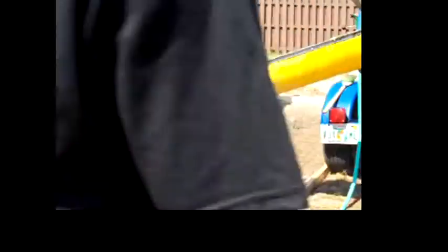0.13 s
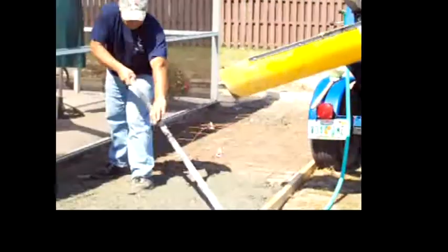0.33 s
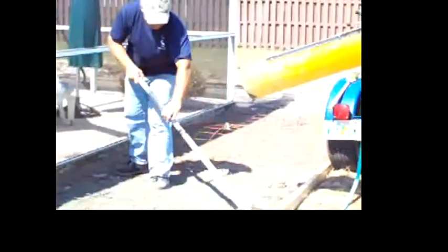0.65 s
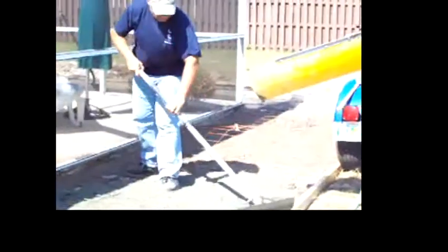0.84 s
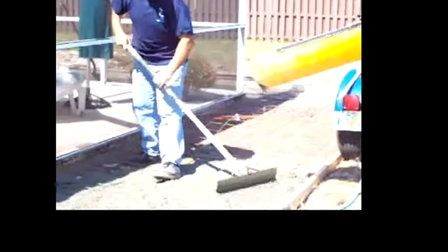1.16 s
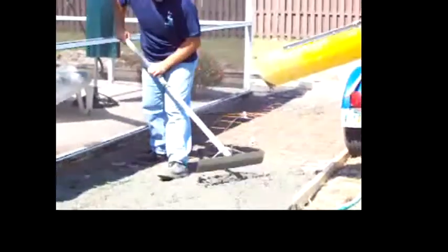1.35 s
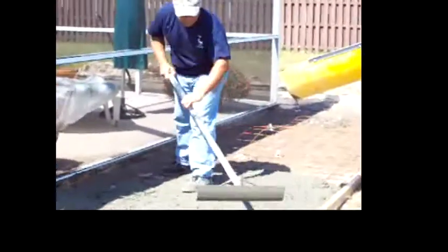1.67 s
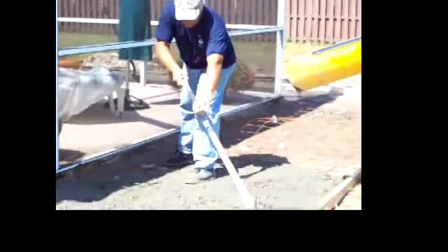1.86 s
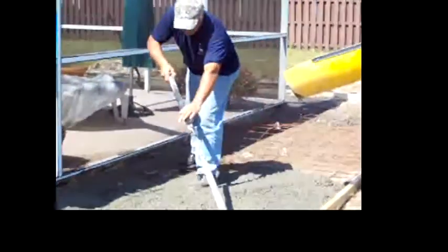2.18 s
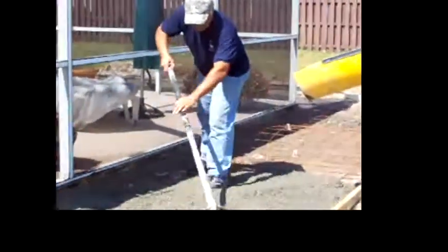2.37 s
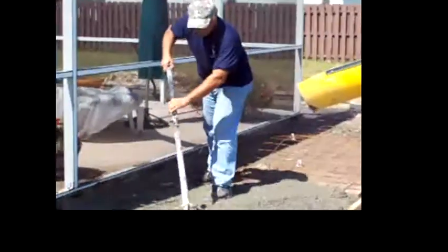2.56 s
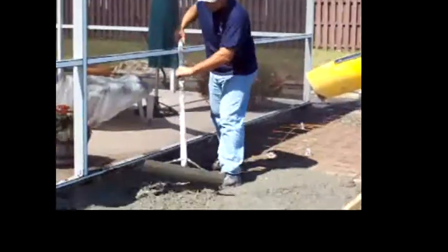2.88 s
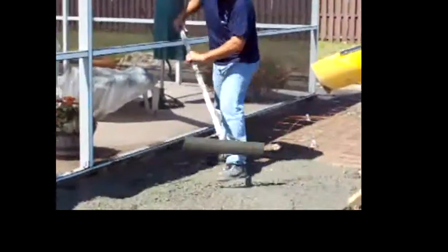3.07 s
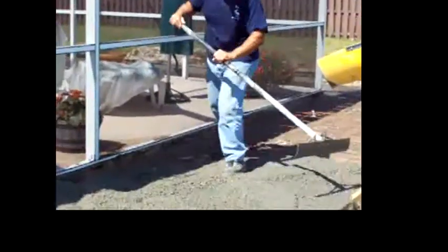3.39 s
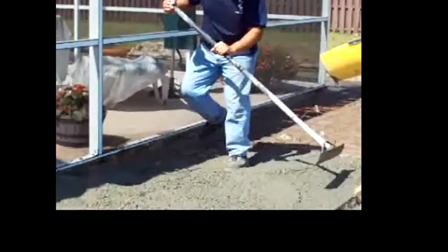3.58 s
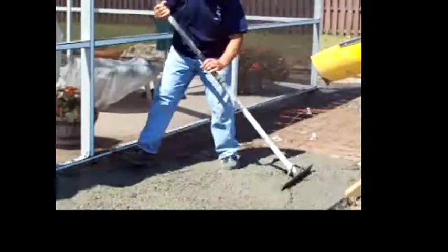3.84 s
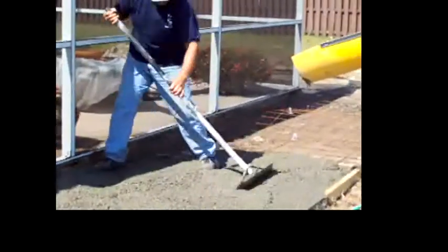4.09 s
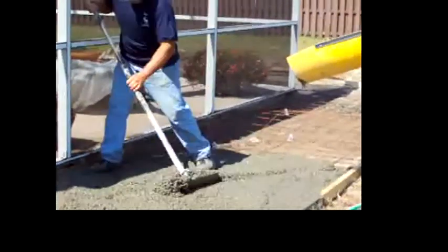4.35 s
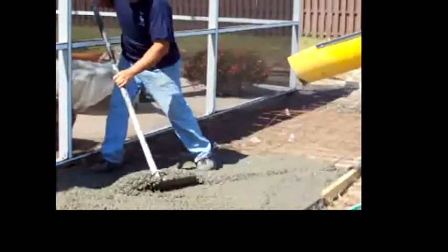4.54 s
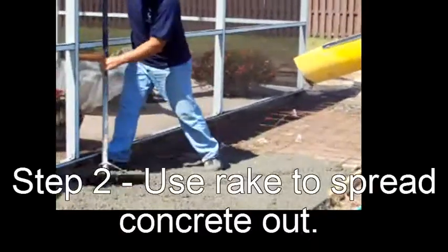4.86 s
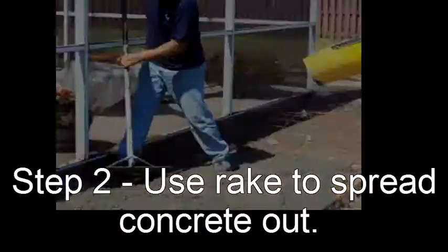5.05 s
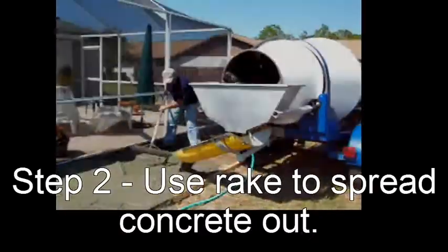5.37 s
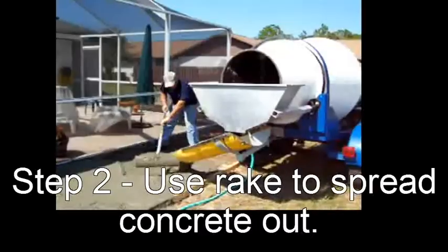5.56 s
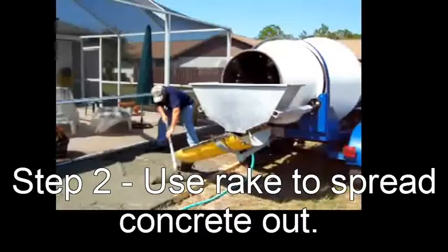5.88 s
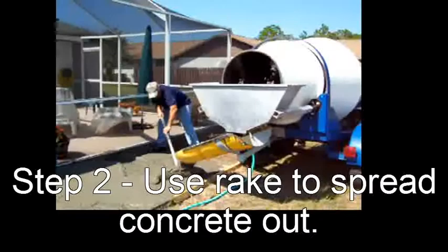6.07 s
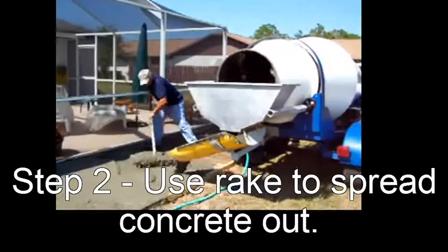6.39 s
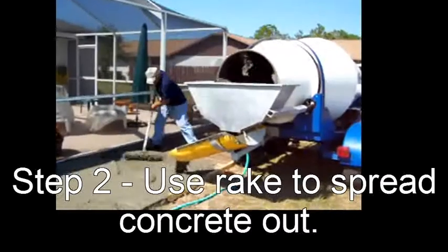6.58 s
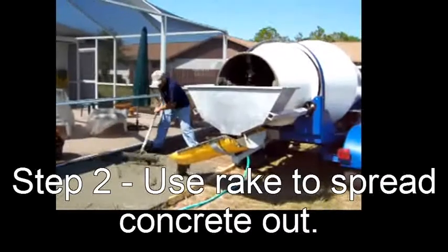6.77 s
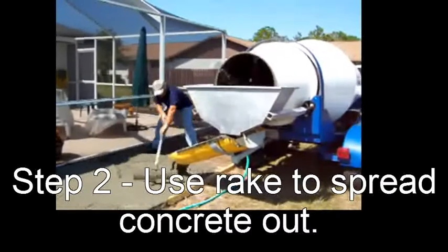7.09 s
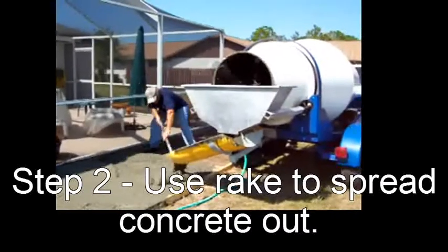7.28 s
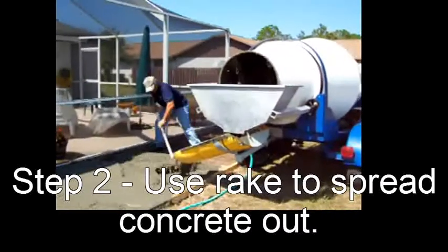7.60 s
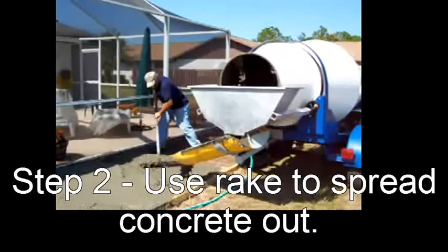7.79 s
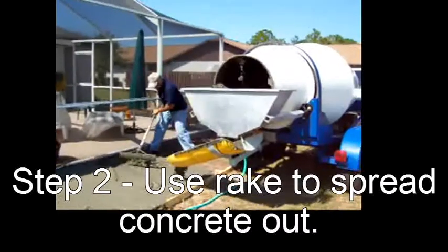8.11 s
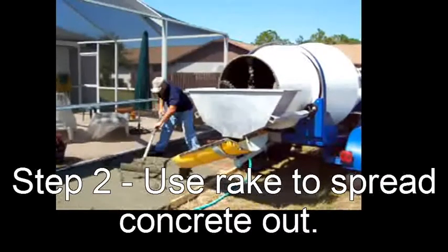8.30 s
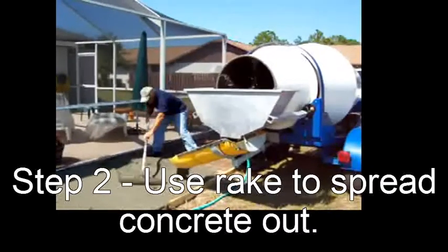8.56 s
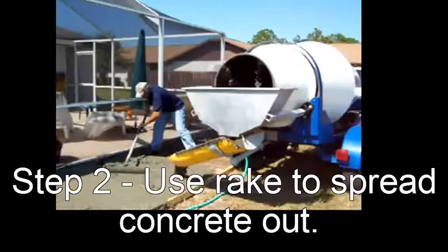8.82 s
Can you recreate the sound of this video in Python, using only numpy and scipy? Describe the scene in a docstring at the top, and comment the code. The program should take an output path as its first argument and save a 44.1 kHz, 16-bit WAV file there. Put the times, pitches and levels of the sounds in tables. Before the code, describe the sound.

A concrete mixer's engine drones in rapid throbbing puffs, heard first from beside the slab with rattling valves, a faint high whine and wet stones tumbling. A few clicks and knocks stand out. After a third of a second of silence, the view is nearer the drum: heavier churning, hollow steel ringing, no whine, gradually softening. Dull, narrow-band, slightly overloaded pickup in an open yard.

```python
"""In a back yard, a single-cylinder four-stroke engine turns the steel drum of a concrete mixer trailer.
The exhaust throbs as a stack of tones locked to the firing, and a thin drive whine sings with it at first.
Valves and piston clatter as noise bursts, wet gravel churns as random blows, and cooling air is plain noise;
all three are coloured by the steel covers and drum. Single stones and tools knock as ringing bursts.
It is heard first from beside the slab, then, after a short silence, from close to the drum."""
import sys
import numpy as np
from scipy import signal
from scipy.fft import rfft, irfft, next_fast_len
from scipy.io import wavfile
from scipy.ndimage import uniform_filter1d

SR = 44100
rng = np.random.default_rng(int(sys.argv[2]) if len(sys.argv) > 2 else 0)


def transcribe(signal):
    """Save signal, clipped to [-1, 1], as a 16-bit WAV file at the path in sys.argv[1]."""
    frames = np.atleast_2d(signal).T
    limited = np.clip(frames, -1, 1)
    pcm = np.round(limited * 32767).astype(np.int16)
    wavfile.write(sys.argv[1], SR, pcm)


N = 394251
TIME = np.arange(N) / SR

# exhaust tones: multiple of the firing rate, level at the slab/dB, level at the drum/dB
EXHAUST_TONES = [(1, -38, -37), (2, -32.5, -32), (3, -47.5, -38.5), (4, -27, -27.5), (5, -30.5, -31),
                 (6, -27, -22.5), (7, -30.5, -25), (8, -31, -23), (9, -32, -28.5), (10, -34.5, -38.5),
                 (11, -38, -32), (12, -35, -31.5), (13, -50.5, -44.5), (14, -39.5, -51.5), (16, -49, -43),
                 (19, -41.5, -33), (20, -51, -37), (22, -39.5, -35.5), (23, -42.5, -51.5), (24, -39.5, -28),
                 (25, -43, -32), (28, -40, -32.5), (30, -40, -31.5), (32, -40.5, -30.5), (33, -35, -40.5),
                 (34, -35.5, -30), (35, -41, -37.5), (37, -37, -32)]
# broad colour of the machine: f/Hz, density at the slab/dB per Hz, density at the drum/dB per Hz,
# for a drive of unit power and before the panels ring
MACHINE_COLOUR = [(20, -52, -57), (45, -52, -48.5), (90, -51.5, -53.5), (165, -52.5, -53.5),
                  (332, -49, -48.5), (444, -59.5, -59.5), (640, -58, -46.5), (952, -49, -45.5),
                  (1430, -72, -63.5), (1900, -66.5, -59.5), (2455, -55, -52), (2907, -57.5, -53.5),
                  (3086, -62.5, -58.5), (3960, -68.5, -63)]


def from_db(db):
    """Decibels to gain."""
    return 10 ** (np.asarray(db) / 20)


def rms_one(x):
    """Scale to unit power."""
    return x / np.sqrt(np.mean(x ** 2) + 1e-20)


def in_time(rows):
    """Draw each column of a time table as a curve over every sample."""
    times, *columns = np.transpose(rows)
    return [np.interp(TIME, times, column) for column in columns]


def swing_db(load):
    """How far churning and rattle stand above the mean of their table rows, in dB."""
    means = np.mean(load, axis=0)[1:]
    return [curve - mean for curve, mean in zip(in_time(load), means)]


def drift(rate_hz):
    """Slow random wander with a spread of one: noise through two equal one-pole lowpasses."""
    step = 40  # samples between the points of the wander
    r = np.exp(-2 * np.pi * rate_hz * step / SR)
    noise = rng.standard_normal(N // step + 2002)
    slow = signal.lfilter([1], [1, -2 * r, r * r], noise)[2000:]  # drop the filter's start-up
    return np.interp(np.arange(N) / step, np.arange(len(slow)), rms_one(slow))


def resonate(x, hz, width_hz):
    """One two-pole resonance with a gain of one at its peak."""
    r = np.exp(-np.pi * width_hz / SR)
    zeros = np.array([1, 0, -1]) * (1 - r * r) / 2
    poles = [1, -2 * r * np.cos(2 * np.pi * hz / SR), r * r]
    return signal.lfilter(zeros, poles, x)


def coloured(x, hz, db):
    """Shape a white signal of unit power to a spectrum in dB per Hz, falling off below the first point."""
    size = next_fast_len(N)
    f = np.maximum(np.arange(size // 2 + 1) * SR / size, 1)
    gain = from_db(np.interp(np.log(f), np.log(hz), db)) * np.minimum(f / hz[0], 1)
    return irfft(rfft(x, size) * gain, size)[:N] * np.sqrt(SR / 2)


def heard(span, fade_in_s=0.022, fade_out_s=0.00092):
    """One within a stretch of time, zero outside, with quick edges."""
    opening = (TIME - span[0]) / fade_in_s + .5
    closing = (span[1] - TIME) / fade_out_s
    return np.clip(np.minimum(opening, closing), 0, 1) ** 2


def crank(speed, start_s, wobble=.0012):
    """Engine cycles, one firing each, counted from a start time; no two take quite as long."""
    rate, = in_time(speed)
    return np.cumsum(rate * (TIME >= start_s)) / SR + wobble * drift(12)


def boom_db(order):
    """Now and then one exhaust tone booms out in a bell-shaped swell."""
    # booms: t at the height/s, multiple of the firing rate, lift/dB, length/s
    booms = [(0.302, 24, 8.5, .9), (0.397, 7, 6, 0.98), (2.9, 8, 9.5, 0.87), (3.25, 11, 17.5, 0.34),
             (3.904, 11, 8.5, 0.22), (5.996, 12, 8.5, 0.22), (6.891, 24, 8, 0.72), (7.245, 12, 7, 0.82),
             (4.352, 8, 6, 0.32), (5.102, 8, 7, 0.47), (8.252, 9, 7.5, 0.7)]
    return sum(db * np.exp(-(2 * (TIME - s) / length) ** 2)
               for s, which, db, length in booms if round(which) == order)


def exhaust(cycles, levels, rings_hz, unsteady_db=0.3, slip=0.016, scatter=.2):
    """One puff a cycle as a stack of tones; muffler and yard smear the puff across the cycle."""
    firing_hz, ring_half_width_hz = 28, 4  # nominal rate that sets the lags
    fade_db_per_order, fade_most_db, fades_hz = 0.2, 3, 1.8
    diffuse_order = 6  # tones above this multiple arrive by many paths, out of step
    force = unsteady_db * drift(7.5)
    out = 0
    for order, db in zip(np.round(np.array(EXHAUST_TONES)[:, 0]), levels):
        # tones fade in and out among the yard's echoes, the high ones more deeply
        fading = min(fade_db_per_order * order, fade_most_db) * drift(fades_hz)
        # each resonance holds the puff back by its phase, in radians
        lag = sum(np.arctan((order * firing_hz - hz) / ring_half_width_hz) for hz in rings_hz)
        lag = lag + slip * order * drift(5)
        lag = lag + scatter * max(order - diffuse_order, 0) * rng.standard_normal()
        gain = np.sqrt(2) * from_db(db + fading + boom_db(order) + force)
        out = out + gain * np.cos(2 * np.pi * order * cycles - lag)
    return out


def whine(speed, waver_hz=13, flicker_db=1.0):
    """The drive, geared to the engine, sings one thin wavering tone that rises and falls with its speed."""
    per_firing = 72.5  # whine cycles per firing
    start_db, rise_db, rise_at_s, rise_s = -39, 4.7, 4, .25  # it grows louder once and stays so
    hz = per_firing * in_time(speed)[0] + waver_hz * drift(25)
    db = start_db + rise_db * np.clip((TIME - rise_at_s) / rise_s + .5, 0, 1)
    gain = np.sqrt(2) * from_db(db + flicker_db * drift(22))
    return gain * np.sin(2 * np.pi * np.cumsum(hz) / SR)


def clatter(cycles, decay=0.12, repeat_db=7.0, low_hz=420):
    """Valves and piston strike at fixed crank angles; each short rattle partly repeats every cycle."""
    # metal contacts: share of the cycle, relative strength/dB
    contacts = [(0.209, 1.5), (.29, -6.5), (.65, -1), (.85, 0.5)]
    force = 0
    for angle, db in contacts:
        since_strike = (cycles - angle) % 1
        force = force + from_db(db) * np.exp(-since_strike / decay)  # decay as a share of the cycle
    pattern = rng.standard_normal(1560)
    place = (cycles % 1 * (len(pattern) - 1)).astype(int)
    rattle = rng.standard_normal(N) + from_db(repeat_db) * pattern[place]
    # hard contacts carry little bass
    no_bass = signal.butter(2, low_hz, "high", fs=SR, output="sos")
    return rms_one(signal.sosfilt(no_bass, force * rattle))


def gravel(per_s=2500, size_db=2.0, clump_db=2.0, low_hz=250):
    """Stones tumble against the drum wall as random single blows that come in clumps."""
    hits = rng.random(N) < per_s * from_db(clump_db * drift(9)) / SR
    size = from_db(size_db * np.minimum(rng.exponential(1, N), 4))
    blows = hits * size * rng.choice([-1, 1], N)
    no_bass = signal.butter(1, low_hz, "high", fs=SR, output="sos")
    return rms_one(signal.sosfilt(no_bass, blows))


def machine(cycles, colour, panels, load, clatter_db, gravel_db, fan_db, split_hz=1600):
    """Clatter, gravel and cooling air all sound through the same steel covers and drum."""
    surge_db, surges_hz = .5, 2.3  # the churning surges at random as the mix tumbles
    drive = from_db(clatter_db) * clatter(cycles) + from_db(gravel_db) * gravel()
    drive = drive + from_db(fan_db) * rng.standard_normal(N)
    body = coloured(drive, np.array(MACHINE_COLOUR)[:, 0], colour)
    body = body + sum((from_db(db) - 1) * resonate(body, hz, width) for hz, width, db in panels)
    low = signal.sosfiltfilt(signal.butter(2, split_hz, fs=SR, output="sos"), body)
    high = body - low
    churn_db, rattle_db = swing_db(load)
    churn_db = churn_db + surge_db * drift(surges_hz)
    return from_db(churn_db) * low + from_db(rattle_db) * high


def knocks():
    """Stones and tools knock singly: each a brief noise burst that rings broadly around its pitch."""
    # knocks and clacks: t/s, level/dB, f/Hz, decay/s
    strikes = [(.3244, -12, 2100, .003), (.3258, -7, 2750, .003), (.3292, -8, 950, .0035),
               (.71, -24, 3200, .02), (.805, -22, 2700, .006), (1.137, -17.5, 2700, .014),
               (2.084, -20, 2700, .008), (3.858, -22, 2750, .02), (3.888, -20.5, 2650, .035),
               (5.738, -12, 750, .022), (6.3845, -15, 2500, .005), (7.396, -16, 2500, .006)]
    out = np.zeros(N)
    age = np.arange(SR // 5) / SR
    for s, db, hz, decay in strikes:
        dying = np.exp(-age / decay)
        burst = rms_one(resonate(rng.standard_normal(len(age)), hz, hz / 2) * dying)
        at = round(s * SR)
        # a longer decay carries more energy
        out[at:at + len(age)] += from_db(db) * burst * np.sqrt(np.mean(dying ** 2))
    return out


def scene(exhaust_follows=0.76):
    """The mixer from the slab, then from beside the drum, where the exhaust eases with the load."""
    # the two listening spots: start t/s, end t/s
    spots = [(0, 5.251), (5.566, 9)]
    # engine speed, hunting around 28 firings a second: t/s, firing rate/Hz
    speed_slab = [(0, 28.47), (0.28, 28.15), (0.62, 28.13), (1, 28.56), (2.8, 28.4), (3.35, 27.93),
                  (3.95, 28.51), (4.4, 28.36), (5.25, 28.34)]
    speed_drum = [(5.57, 27.39), (5.8, 27.11), (6.38, 28.48), (6.78, 27.34), (7.55, 27.76), (8.05, 28.07),
                  (8.42, 27.95), (8.72, 27.22), (8.93, 27.9)]
    # ringing panels and covers that face each spot: f/Hz, width/Hz, lift/dB (negative dips)
    panels_slab = [(557, 0.94, 8), (674, 20, 6), (960, 16, -2), (1107, 62, 5), (1393, 13, 6.5),
                   (1583, 72, 9.5), (2160, 15, -0.5), (2320, 11, -6.5), (2697, 40, 8), (3207, 73, 5.5),
                   (3600, 44, 1.5)]
    panels_drum = [(555, 7.9, 7.2), (658.4, 17, 4.8), (1047, 18, 3.5), (1247, 19, 3.7), (1548, 41, 5.1),
                   (2330, 45, 5), (2383, 30, 9.9), (2826, 38, 5.9), (3670, 80, 4.3)]
    # loudness of the load, used relative to its mean: t/s, churning level/dB, rattle level/dB
    load_slab = [(0, -23.5, -25), (1.2, -20.5, -23), (1.8, -21, -25), (3.401, -22.5, -25),
                 (5.25, -22, -24.5)]
    load_drum = [(5.6, -12, -15), (6.6, -14, -19), (7.5, -14, -17.8), (7.85, -16, -21), (8.9, -16.5, -19.5)]
    # muffler and yard resonances that hold the puff back
    rings_slab_hz, rings_drum_hz = [155, 233, 265], [125, 186, 300]
    puff_at_slab, puff_at_drum = .72, .49  # share of the cycle at which the puff arrives
    _, tones_slab, tones_drum = np.transpose(EXHAUST_TONES)
    _, colour_slab, colour_drum = np.transpose(MACHINE_COLOUR)

    far = crank(speed_slab, spots[0][0])
    slab = exhaust(far - puff_at_slab, tones_slab, rings_slab_hz) + whine(speed_slab)
    slab += machine(far - .036, colour_slab, panels_slab, load_slab,
                    clatter_db=-6.5, gravel_db=-6.0, fan_db=-3.0)

    near = crank(speed_drum, spots[1][0])
    drum = exhaust(near - puff_at_drum, tones_drum, rings_drum_hz)
    drum *= from_db(exhaust_follows * swing_db(load_drum)[0])
    drum += machine(near - .38, colour_drum, panels_drum, load_drum,
                    clatter_db=-9.0, gravel_db=-4.5, fan_db=-2.0)
    return (slab * heard(spots[0]) + drum * heard(spots[1]) + knocks())[None]


def record(dry):
    """A narrow-band channel that clips; faint treble noise that follows the sound's level flickers mostly above
    it, and one sharp tick sounds."""
    # faint treble noise: f/Hz, density/dB per Hz relative to the sound's level
    hiss = [(3000, -100), (4300, -93.5), (5500, -88.5), (6400, -106.5), (7200, -90), (8300, -91),
            (9600, -104), (15500, -110)]
    mic_top_hz, cutoff_hz = 3900, 15800
    tick_s, tick_db = 7.7221, 2.0
    mic_band = signal.ellip(10, .1, 60, mic_top_hz, fs=SR, output="sos")
    out = signal.sosfiltfilt(mic_band, np.clip(dry, -.88, .88))
    level = np.sqrt(np.abs(uniform_filter1d(out ** 2, size=600)))
    out = out + level * coloured(rng.standard_normal(N), *np.transpose(hiss))
    out[:, round(tick_s * SR)] += from_db(tick_db)
    return signal.sosfilt(signal.ellip(10, .3, 80, cutoff_hz, fs=SR, output="sos"), out)


dry = scene()
out = record(dry)
transcribe(out)
```